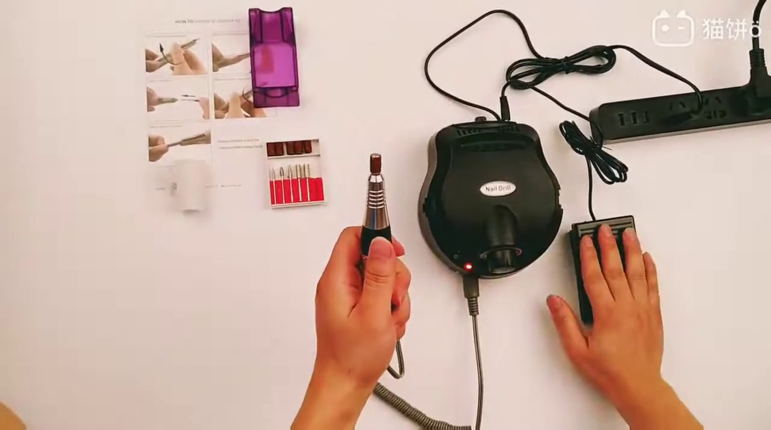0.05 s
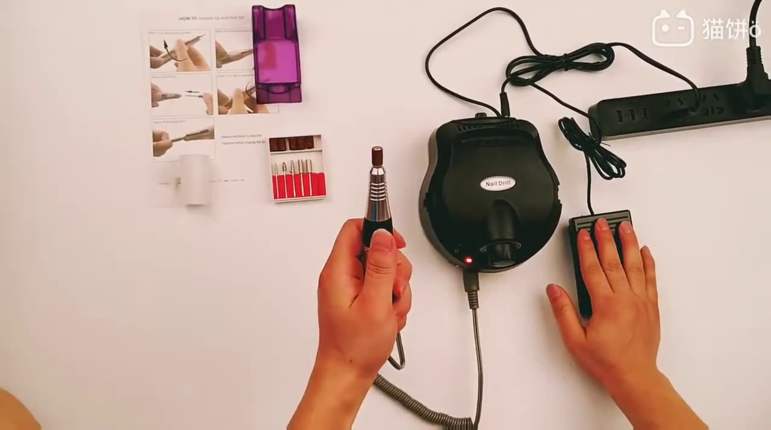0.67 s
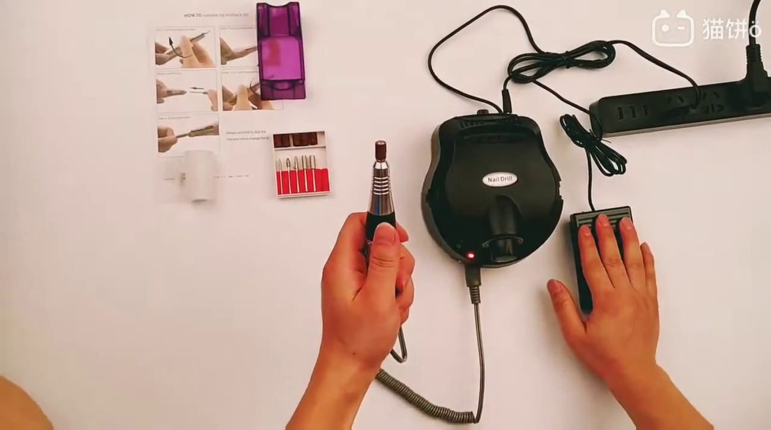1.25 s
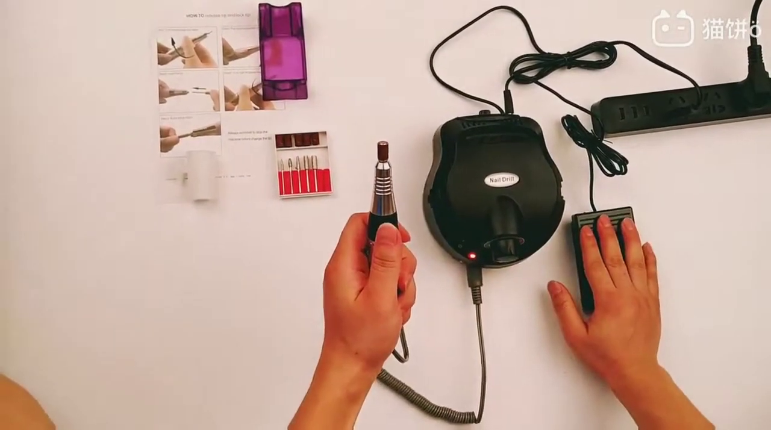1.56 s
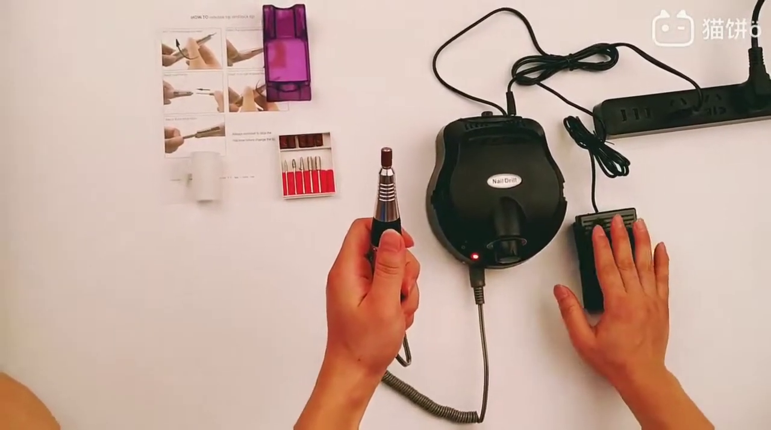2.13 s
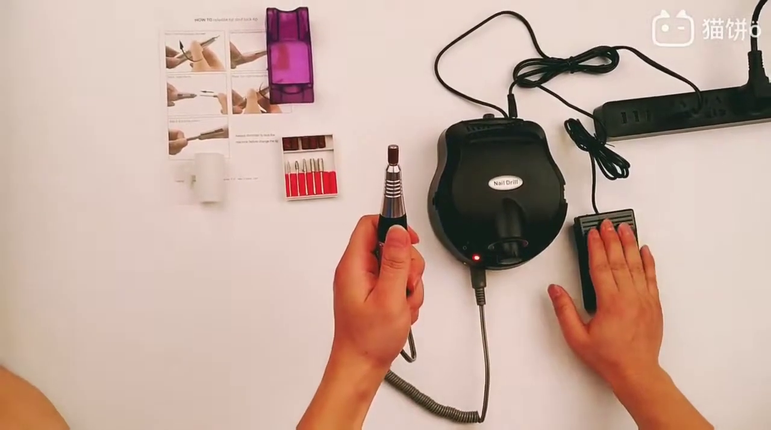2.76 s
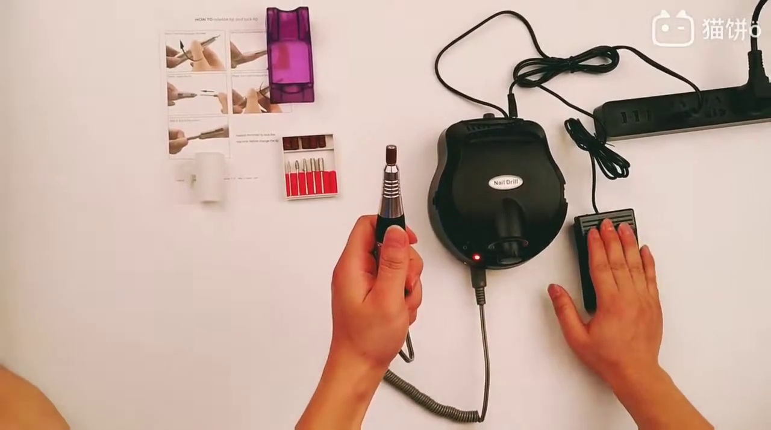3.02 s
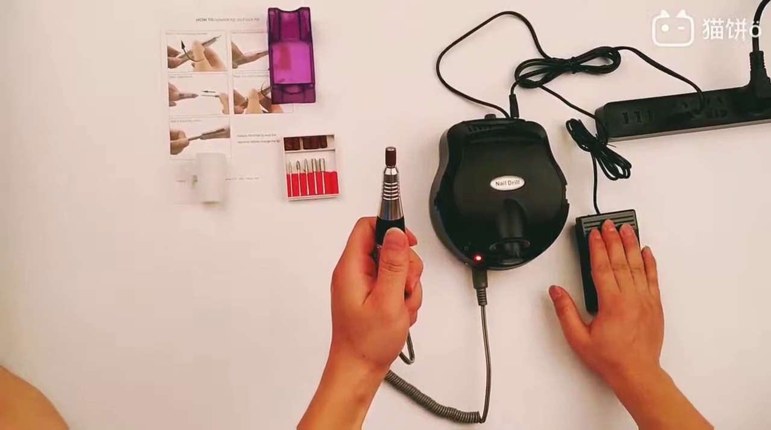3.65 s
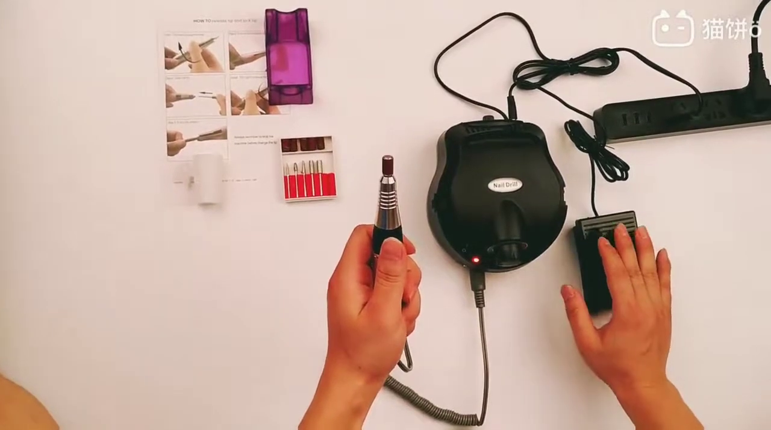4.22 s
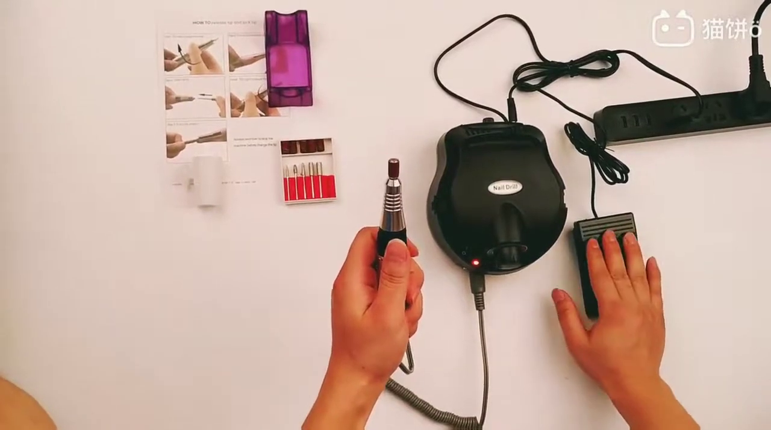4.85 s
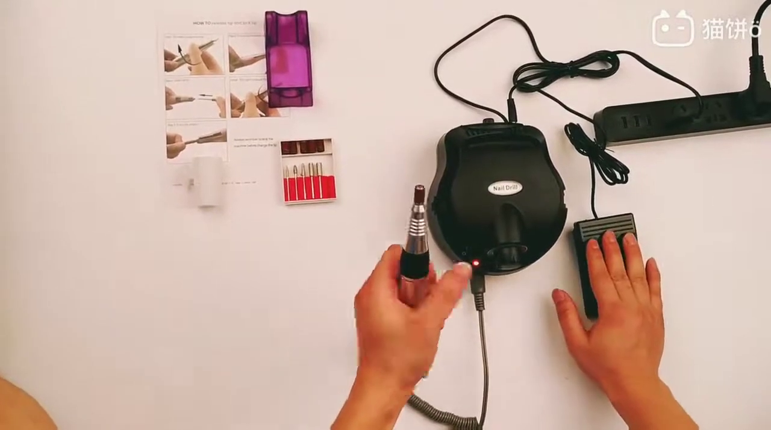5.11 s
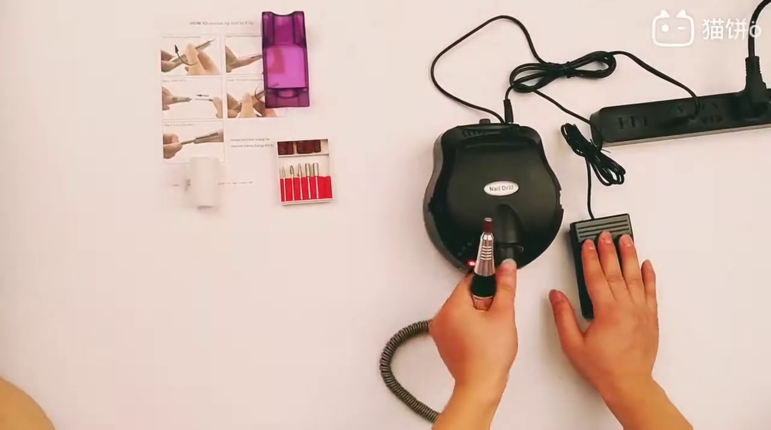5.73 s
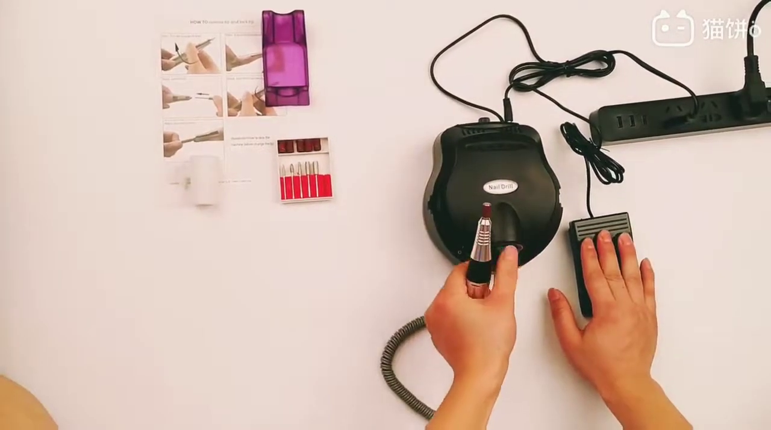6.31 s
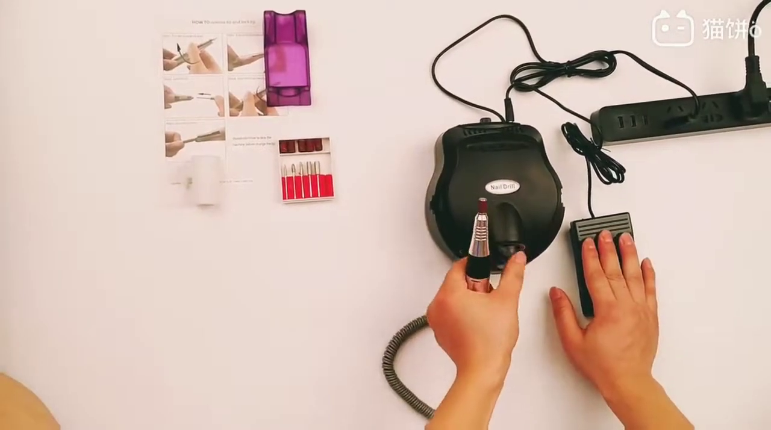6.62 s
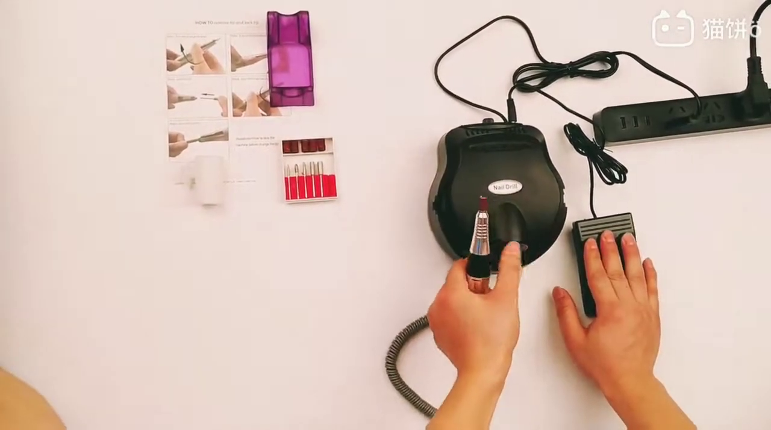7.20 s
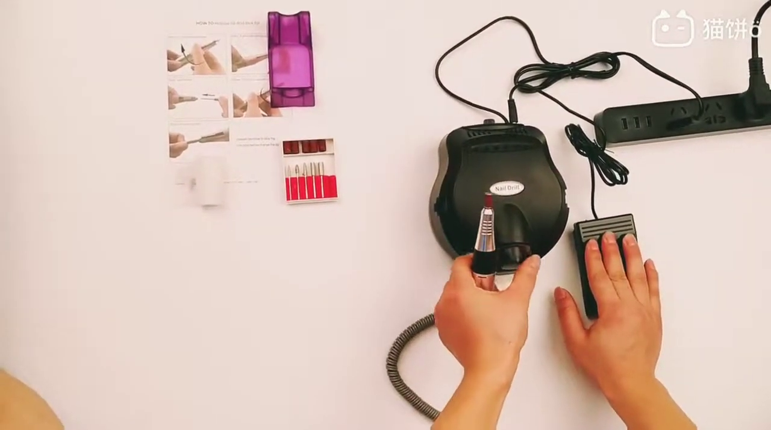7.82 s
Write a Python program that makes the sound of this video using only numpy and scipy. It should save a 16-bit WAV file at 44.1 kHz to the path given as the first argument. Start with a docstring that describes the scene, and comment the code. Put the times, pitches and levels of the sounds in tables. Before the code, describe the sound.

A plastic pedal switch clacks on a desk and a small electric nail drill spins up to a high, buzzing whine. The pedal snaps back and the motor coasts down. This happens twice. On a third press the drill keeps running, with a few soft handling knocks, then rises in pitch in three steps, turning raspier with a hum underneath. The sound is close, in a small quiet room.

```python
"""An electric nail drill runs free in one hand above a desk; the other hand works its pedal switch.
Twice the pedal clacks down, the motor whines up, the pedal springs back and the motor coasts to rest.
On the third run the handpiece is carried over to the control box, the speed knob is turned up in three
steps, and near top speed the rotor hums. Pedal blows ring the desk, plastic shell and switch;
the bearings rub and scrape with each turn and ring the handpiece."""
import sys
import numpy as np
from scipy import signal
from scipy.fft import rfft, irfft, next_fast_len
from scipy.io import wavfile
from scipy.ndimage import uniform_filter1d, map_coordinates

SR = 44100
rng = np.random.default_rng(int(sys.argv[2]) if len(sys.argv) > 2 else 0)


def generate_wav(sig):
    """Save sig (samples, or channels by samples) to the path in sys.argv[1] as 16-bit PCM at SR."""
    pcm = np.round(np.clip(np.atleast_2d(sig).T, -1, 1) * 32767).astype(np.int16)
    wavfile.write(sys.argv[1], SR, pcm)


N = 355446
TIME = np.arange(N) / SR
FFT_SIZE = next_fast_len(N, True)
FREQS = np.fft.rfftfreq(FFT_SIZE, 1 / SR)
LOW_HZ, TOP_HZ = 205, 264  # shaft speed settings

# handpiece pose: time_s, over_box (0 upright, 1 over the box), left_lead_ms, pan_db
POSE = [(4.9, 0.24, 0.762, 1), (5.3, 1, -0.12, 1.5), (5.6, 0.74, -0.072, -2), (6.3, 0.78, -0.063, -2),
        (6.6, 0.89, -0.055, 0.5), (7.5, 0.99, -0.0612, 0.5)]
# pedal down, motor starts: start_s, snap_db, thud_db, rebound_delay_s, rebound_db
PRESSES = [(0.1226, -28.5, -83, 0.034, -8), (2.352, -29, -63, .016, 4), (4.639, -25, -51, .009, -0.5)]
# pedal up, motor coasts: start_s, strength_db
RELEASES = [(1.507, 1), (3.6928, -1)]


def amp(db):
    """Decibels to gain."""
    return 10 ** (np.asarray(db) / 20)


def unit(x):
    """Scale to rms 1."""
    return x / np.sqrt(np.mean(abs(x) ** 2) + 1e-20)


def ramp(start_s, length_s):
    """Linear rise from 0 to 1."""
    return np.clip((TIME - start_s) / length_s, 0, 1)


def curves(rows):
    """Columns of a timed table at every sample."""
    time_s, *columns = np.transpose(rows)
    return [np.interp(TIME, time_s, column) for column in columns]


def at_hz(points, hz):
    """Interpolate a table over log frequency."""
    points_hz, values = np.transpose(points)
    return np.interp(np.log(hz + 1), np.log(points_hz + 1), values)


def filtered(x, gain):
    """Filter by a gain for each of FREQS."""
    return irfft(rfft(x, FFT_SIZE) * gain, FFT_SIZE)[..., :N]


def colour(x, spectrum):
    """Filter by rows of freq_hz, gain_db."""
    return filtered(x, amp(at_hz(spectrum, FREQS)))


def delayed(x, delay_ms):
    """Time-varying delay."""
    return map_coordinates(x, [(TIME - delay_ms / 1000) * SR], order=3, mode="nearest")


def add(mix, start_s, sound):
    """Mix in a stereo sound."""
    part = mix[:, round(start_s * SR):][:, :sound.shape[1]]
    part += sound[:, :part.shape[1]]


def pair(sides, alike):
    """Give two independent signals the correlation alike."""
    return np.array([sides[0], alike * sides[0] + np.sqrt(1 - alike ** 2) * sides[1]])


def stereo_noise(alike, size=N):
    """White noise, partly correlated left to right."""
    return pair(rng.standard_normal((2, size)), alike)


def wander(rate_hz):
    """Random waver around rate_hz, rms 1."""
    ratio = FREQS / rate_hz
    return unit(filtered(rng.standard_normal(N), ratio / (1 + ratio ** 3)))


def background(level_db=-76.5):
    """Faint steady room noise."""
    # noise spectrum: freq_hz, gain_db
    spectrum = [(15, -18), (25, 0), (86, -7), (1200, -19), (1600, -21), (1980, -25), (3080, -20),
                (3510, -16.5), (3900, -28.5), (6410, -21), (13000, -30.5)]
    return amp(level_db) * unit(colour(stereo_noise(alike=0.39), spectrum))


def room(x, alike=0.25, gap_s=.006, size=20000):
    """Small room: dense reflections, each band dying at its own rate."""
    # room decay: freq_hz, t60_s
    decay = [(100, 0.07), (250, 0.33), (1000, 0.26), (4000, 0.28), (13000, 0.16)]
    taps = stereo_noise(alike, size) * (np.arange(size) > gap_s * SR)
    hz, t, spectra = signal.stft(taps, SR, nperseg=256)
    tail = signal.istft(spectra * amp(-60 * t / at_hz(decay, hz)[:, None]), SR, nperseg=256)[1]
    return signal.oaconvolve(x, tail / np.linalg.norm(tail[0]), axes=1)[:, :N]


def desk_thud(band_hz=(165, 400), attack_s=0.0045, sway_hz=80, sway_db=-19, sway_s=0.02, size=8192):
    """A soft push rings the desk's low modes and sways its whole top."""
    # desk modes: freq_hz, width_hz, gain_db
    modes = [(170.3, 47, 0.5), (224, 50.4, 1.5), (288.6, 54, -4), (336, 85, -8.5)]
    t = np.arange(size) / SR
    ring = sum(amp(db) * np.exp(-np.pi * width_hz * t)
               * np.sin(2 * np.pi * hz * rng.uniform(0.9, 1.088) * t) for hz, width_hz, db in modes)
    bandpass = signal.butter(3, band_hz, "bandpass", fs=SR, output="sos")
    ring = signal.sosfilt(bandpass, ring * (1 - np.exp(-t / attack_s)))
    ring /= np.sqrt(np.mean(ring[:SR // 100] ** 2))
    sway = amp(sway_db) * np.exp(-t / sway_s) * np.sin(2 * np.pi * sway_hz * t)
    return np.array([ring + sway] * 2)


def strike(modes, chatter_s, alike, detune, attack_s=0.00037, size=8192):
    """A chattering contact rings slightly detuned modes; rms 1 over the first 10 ms."""
    t = np.arange(size) / SR
    force = stereo_noise(alike, size) * np.exp(-t / chatter_s) * (1 - np.exp(-t / attack_s))
    ring = sum(amp(db) * width_hz * np.exp(-np.pi * width_hz * t)
               * np.cos(2 * np.pi * hz * (1 + detune * rng.uniform(0.27, 1)) * t)
               for hz, width_hz, db in modes)
    sound = signal.fftconvolve(force, ring[None], axes=1)[:, :size]
    return sound / np.sqrt(np.mean(sound[:, :SR // 100] ** 2))


def blows(press_chatter_s=0.0079, shell_offset_db=-10.5):
    """Knocks, presses and releases as start_s, (thud_db, shell_db, snap_db), chatter_s, switch modes."""
    # modes of the switch in its case: freq_hz, width_hz, closing_db, opening_db
    switch_modes = [(2380, 260, -14, 1), (3020, 300, -3, 0), (4060, 250, 4, 4), (4420, 400, -9, 0),
                    (5060, 240, 5, -11), (5950, 340, 2, -14), (6880, 400, 0, -4), (7900, 420, 0, 1),
                    (8500, 500, -4, 0), (9250, 450, -8, 0), (9950, 450, -1, -4), (11000, 500, -5, 2),
                    (12100, 450, -7, -18), (6500, 6000, -16, -21)]
    # fingers on pedal and box: start_s, thud_db, shell_db, snap_db, chatter_s
    knocks = [(.025, -48, -49.5, -71, 0.029), (0.101, -77, -52, -45, 0.012),
              (2.202, -41.5, -65.5, -71.5, 0.072), (2.312, -44, -43, -68, 0.0043),
              (2.329, -60, -48.5, -67, 0.026), (4.442, -82.5, -86, -77, 0.013),
              (4.487, -89, -88, -82.5, 0.0052), (4.543, -40, -67, -70, 0.052),
              (4.615, -42, -39.5, -61, 0.0083), (5.262, -52, -59.5, -78, 0.016),
              (5.283, -48, -62, -71, 0.032), (5.859, -66, -70, -63, 0.032)]
    # offsets that dull a rebound: thud_db, shell_db, snap_db
    dulling_db = (6, -3.5, -16.5)
    # switch opens, lid hits its stop, bounces, settles: delay_s, thud_db, shell_db, snap_db, chatter_s
    spring_back = [(0, -56, -38.5, -25, 0.0059), (.0095, -43, -29.5, -30, 0.014),
                   (.022, -52.5, -38.5, -37, .007), (.047, -43, -56, -68.5, .01)]
    closing = [(hz, width_hz, db) for hz, width_hz, db, _ in switch_modes]
    opening = [(hz, width_hz, db) for hz, width_hz, _, db in switch_modes]
    for start_s, *levels_db, chatter_s in knocks:
        yield start_s, levels_db, chatter_s, closing
    for start_s, snap_db, thud_db, rebound_s, rebound_db in PRESSES:
        levels_db = np.array([thud_db, snap_db + shell_offset_db, snap_db])
        yield start_s, levels_db, press_chatter_s, closing
        yield start_s + rebound_s, levels_db + dulling_db + rebound_db, press_chatter_s / 2, closing
    for start_s, strength_db in RELEASES:
        for delay_s, *levels_db, chatter_s in spring_back:
            yield start_s + delay_s, np.array(levels_db) + strength_db, chatter_s, opening


def pedal(shell_band_hz=(200, 1680)):
    """Each blow thuds through the desk, rattles the plastic shell and rings the switch."""
    # shell modes: freq_hz, width_hz, gain_db
    shell_modes = [(493, 230, -13), (865, 39, 1), (1023, 110, 9), (1280, 73, -4.5), (1563, 180, -1)]
    thud, shell, snap = np.zeros((3, 2, N))
    for start_s, (thud_db, shell_db, snap_db), chatter_s, switch_modes in blows():
        add(thud, start_s, amp(thud_db) * desk_thud())
        add(shell, start_s, amp(shell_db) * strike(shell_modes, chatter_s, alike=0.48, detune=0.0067))
        add(snap, start_s, amp(snap_db) * strike(switch_modes, chatter_s, alike=0.11, detune=0.0063))
    plastic_damping = signal.butter(4, shell_band_hz, "bandpass", fs=SR, output="sos")
    shell = signal.sosfilt(plastic_damping, shell)
    reflections = amp(-3) * room(thud, alike=0.93) + amp(-9) * room(shell) + amp(-10) * room(snap)
    return thud + shell + snap + reflections


def shaft(lag_s=.048, coast_s=.69, flutter=.0014, flutter_hz=22):
    """Speed and angle: the rotor lags pedal and knob; once released, friction brakes it evenly."""
    # powered speed without the knob steps: time_s, speed_hz
    cruise = [(.42, 198.8), (.62, 201.3), (.78, 201.4), (1.0, 204.4), (1.25, 205.45), (1.5, 205.2),
              (2.6, 203.4), (3.0, 205.9), (3.28, 204.6), (3.55, 204.4), (3.69, 203.5), (4.9, 204.2),
              (5.22, 204.75), (5.42, 206.0), (5.64, 206.1), (6.1, 207.15), (6.38, 206.15)]
    # knob turns: start_s, length_s, step_hz
    knob_steps = [(6.42, .14, 24.4), (6.87, .1, 8.8), (7.305, .1, 24.7)]
    pole = np.exp(-1 / (lag_s * SR))
    knob_hz = sum(step_hz * ramp(start_s, length_s) for start_s, length_s, step_hz in knob_steps)
    knob_hz = signal.lfilter([1 - pole], [1, -pole], knob_hz)
    stops_s = [start_s for start_s, _ in RELEASES] + [np.inf]
    running = sum((1 - np.exp(-np.maximum(TIME - on_s, 0) / lag_s)) * (1 - ramp(off_s, coast_s))
                  for (on_s, *_), off_s in zip(PRESSES, stops_s))
    speed_hz = running * (curves(cruise)[0] + knob_hz) * (1 + flutter * wander(flutter_hz))
    return speed_hz, np.cumsum(speed_hz) / SR


def partials(speed_hz, turns, range_hz=6.7, pan_db=-2, waver_db=2, waver_hz=10):
    """A few shaft orders stand out of the whirr near the low setting."""
    # tones: shaft_order, level_db
    orders = [(7, -70), (9, -69), (10, -68), (21, -66), (24, -70)]
    near_low = np.exp(-((speed_hz - LOW_HZ) / range_hz) ** 2)
    lean_db = np.array([[pan_db], [-pan_db]]) / 2
    tones = sum(amp(db + waver_db * wander(waver_hz) + lean_db)
                * np.sin(2 * np.pi * (round(order) * turns + rng.random((2, 1)))) for order, db in orders)
    return np.sqrt(2) * near_low * tones


def rotor_hum(turns, start_s=7.39, attack_s=0.1, release_s=0.041, waver_db=3, waver_hz=11):
    """Orders of the unbalanced rotor, each wavering by itself; timed to the last knob step."""
    # hum tones: shaft_order, level_db, right_phase_rad, end_s
    orders = [(1, -56.5, 0.5, 8.0), (3, -60.5, 0.5, 8.1), (8, -61, 1.5, 9.9), (11, -59, -2, 8.1),
              (14, -60.5, -1.5, 8.1), (18, -67, 2.5, 8.1)]
    out = np.zeros((2, N))
    for order, db, phase_rad, end_s in orders:
        gate = ramp(start_s, attack_s) * (1 - ramp(end_s - release_s, release_s))
        tone = np.sin(2 * np.pi * round(order) * turns + np.array([[0], [phase_rad]]))
        out += gate * amp(db + waver_db * wander(waver_hz)) * tone
    return np.sqrt(2) * out


def grinding(speed_hz, turns, throb=0.41, rattle_db=2, rattle_hz=45):
    """A bearing scrapes unevenly, hardest once a turn, ringing a low growl and a high rasp."""
    # bearing resonances: freq_hz, width_hz, gain_db
    growl_modes = [(1040, 360, -6), (1673, 550, -2.5), (2280, 460, -3.5)]
    rasp_modes = [(5596, 230, -0.5), (6170, 1500, -9.5)]
    # scrape strength: time_s, growl_db, rasp_db
    levels = [(.25, -75, -62), (.6, -62.5, -58.5), (0.998, -68, -75.5), (4.9, -69, -74), (5.25, -61, -61),
              (5.6, -65, -63), (6.3, -66, -64.5), (6.6, -65, -66), (7.25, -61.5, -58.5), (7.45, -56, -57),
              (7.7, -59.5, -60.5), (7.98, -62, -71), (8.03, -50.5, -54.5)]
    pressure = np.exp(throb * np.cos(2 * np.pi * turns))
    scrape = stereo_noise(alike=.3) * pressure * amp(rattle_db * wander(rattle_hz))
    out = np.zeros((2, N))
    for modes, level_db in zip((growl_modes, rasp_modes), curves(levels)):
        response = sum(amp(db) / (1 + (2 * (FREQS - hz) / width_hz) ** 2) ** 2
                       for hz, width_hz, db in modes)
        out += unit(filtered(scrape, response)) * amp(level_db)
    return out * np.minimum(speed_hz / LOW_HZ, 1) ** 3


def order_drift(memory_turns, alike, orders=84, turn_count=1800):
    """Complex amplitude of each shaft order, drifting turn by turn."""
    shape = (2, turn_count, orders)
    fresh = rng.standard_normal(shape) + 1j * rng.standard_normal(shape)
    pole = np.exp(-1 / memory_turns)
    return unit(pair(signal.lfilter([1], [1, -2 * pole, pole ** 2], fresh, axis=1), alike))


def raceway(turns, load=0.3, steps_per_turn=1024):
    """The bearing rolls over nearly the same roughness each turn, pressing hardest on one side."""
    steady = order_drift(memory_turns=20., alike=.6)
    steady = unit(steady / abs(steady) ** 0.87)  # orders of nearly even strength
    restless = order_drift(memory_turns=2.1, alike=.3)
    pressure = np.exp(load * np.cos(2 * np.pi * np.arange(steps_per_turn) / steps_per_turn))
    track = (irfft(steady + 1.4 * restless, steps_per_turn) * pressure).reshape(2, -1)
    position = turns * steps_per_turn
    return unit(np.array([np.interp(position, np.arange(len(side)), side) for side in track]))


def rubbing(speed_hz, turns, slow_hz=196, slip_gain=2.6, slip_hz_per_s=1800,
            throb=0.11, rattle_db=1.1, rattle_hz=40):
    """Bearing buzz; a throbbing hiss takes over when the shaft runs slow or speeds up. Both rattle."""
    # spectra of the repeating buzz, the running hiss and the slipping hiss: freq_hz, gain_db
    buzz_spectrum = [(100, -18), (800, -11), (1200, -4), (1700, -2), (2500, 0), (13000, 0)]
    hiss_spectrum = [(100, -4), (900, -5), (1400, -10), (2000, -20), (3000, -34), (4700, -34), (6200, -24),
                     (7700, -28), (9000, -28), (13000, -25)]
    slip_spectrum = [(100, -4.5), (900, -6), (1700, -2), (3000, 1.5), (4300, 1.5), (13000, 8)]
    urged = np.diff(uniform_filter1d(speed_hz, size=4000), prepend=0) * SR / slip_hz_per_s
    slow = np.clip(2 * (1 - speed_hz / slow_hz), 0, 1) ** .5
    loose = np.clip(np.maximum(slow, urged), 0, 1)
    noise = stereo_noise(alike=0.5) * np.exp(throb * np.cos(2 * np.pi * turns))
    driven = colour(raceway(turns), buzz_spectrum) + colour(noise, hiss_spectrum)
    slipping = slip_gain * colour(noise, slip_spectrum)
    return ((1 - loose) * driven + loose * slipping) * amp(rattle_db * wander(rattle_hz))


def desk_echo(x, echo_db=-10, delay_ms=1.5, sway_ms=.035, sway_hz=.9):
    """The desk reflects the sound; hand sway slides the notches across the shaft orders."""
    return np.array([side + amp(echo_db) * delayed(side, delay_ms + sway_ms * wander(sway_hz))
                     for side in x])


def body(rub, state, top_pan_share=0.16):
    """Handpiece resonances, blended by state: 0 upright, 1 over the box, 2 there at top speed."""
    # resonances: freq_hz, width_hz, upright_db, box_db, top_speed_db, pan_db
    modes = [(496, 2600, -13, -17, -11, -1), (1740, 644, -16.5, -23.5, -11.5, -5.5),
             (3230, 2300, -23, -15.5, -10, -2.5), (4287, 1100, -12, -14.5, -7.5, 2),
             (5050, 310, -9.5, -14, -12.5, -4.5), (5700, 650, -12, -18.5, -10.5, -1.5),
             (6850, 1800, -18, -14, -5.5, -2.5), (7820, 600, -9, -13, -5.5, 5),
             (8320, 710, -5, -12, -2.5, 0.5), (9430, 790, -7.5, -7.5, 2.5, -4),
             (9860, 690, -16.5, -8, -11, -9), (10960, 870, -16.5, -15.5, -5, -5),
             (12300, 750, -15, -17.5, -7, -3)]
    hz, width_hz, *levels_db, pan_db = np.transpose(modes)
    bumps = np.exp2(-np.minimum((2 * (FREQS - hz[:, None]) / width_hz[:, None]) ** 2, 20))
    lean_db = np.array([pan_db, -pan_db]) / 2
    out = np.zeros((2, N))
    for k, (db, pan_share) in enumerate(zip(levels_db, (1, 1, top_pan_share))):
        response = np.sqrt(amp(db + pan_share * lean_db) ** 2 @ bumps)
        out += np.clip(1 - abs(state - k), 0, 1) * filtered(rub, response)
    return out


def whistle(speed_hz, turns, orders=range(35, 49), waver_db=1.6, waver_hz=9):
    """A shaft order sings as it crosses a sharp resonance, louder at higher speed."""
    # resonance upright, then over the box: freq_hz, width_hz, gain_db, speed_power, left_lead_ms, pan_db
    resonances = [(9370, 320, -10.5, 12, 0.019, -8.5), (9610, 270, -10.5, 4, -0.044, -1)]
    over_box = curves(POSE)[0]
    out = np.zeros((2, N))
    for share, (hz, width_hz, db, power, lead_ms, pan_db) in zip((1 - over_box, over_box), resonances):
        tone = sum(np.exp(2j * np.pi * (k * turns + rng.random()))
                   / (1 + 2j * (k * speed_hz - hz) / width_hz) for k in orders)
        tone *= share * (speed_hz / LOW_HZ) ** power * amp(db + waver_db * wander(waver_hz))
        right_lag = np.exp(-2j * np.pi * hz * lead_ms / 1000)
        out += np.sqrt(2) * np.real([tone, tone * right_lag]) * amp([[pan_db / 2], [-pan_db / 2]])
    return out


def handpiece(speed_hz, turns, room_db=-12, flicker_db=0.98, flicker_hz=6.7):
    """Rubbing rings the handpiece; each band is levelled, then grows and fades with shaft speed."""
    # drone, whirr, whine, whistle, fizz: upright_db, box_db, speed_power, fade_speed_hz, pan_share
    bands = [(-54, -62, 2.65, 216, 0.3), (-49.5, -50.5, 0.76, 200, 0.22), (-47.5, -47.5, 0.34, 167, 0.78),
             (-45, -46.5, 3, 149, 2.2), (-51.5, -48, 0.1, 163, 0.87)]
    edges_hz = [0, 2450, 7000, 8900, 10200, SR / 2]
    # band swells: time_s, gain_db
    whirr_swell = [(.8, -3), (.95, 1), (1.1, -1.5), (1.45, 0), (1.7, 2), (2.5, 3.5), (2.75, -0.5),
                   (3.05, -1.5), (4.0, 3.5), (5.0, 0), (5.25, 5), (5.6, 0.5), (6.38, -2), (6.52, 4.5),
                   (6.85, -2), (7.0, 1.5), (7.45, 3), (7.8, 1)]
    whine_swell = [(.2, 0.5), (.45, 1), (.65, -2), (.85, -1.5), (.95, 1.5), (1.3, 0.5), (1.7, 2), (2.5, 2),
                   (2.85, -1), (3.6, -1), (4.75, 3.5), (5.15, -3.5), (5.6, -1), (6.3, -3.5), (6.52, 0.5),
                   (7.2, -1.5), (7.45, -1.5), (7.7, -2.5), (8.0, 0)]
    whistle_swell = [(.3, -0.5), (.5, 3.5), (.7, 0), (1.45, -0.5), (2.5, 1), (2.85, -2.5), (3.5, -.5),
                     (5.051, 0), (5.55, 3.5), (6.1, -3), (6.35, 1.5), (6.55, -0.5), (7.05, 2), (7.29, 2.5),
                     (7.41, 2), (7.55, 3), (7.97, 0), (8.04, 4.5)]
    whirr_db, whine_db, whistle_db = (curves(r)[0] for r in (whirr_swell, whine_swell, whistle_swell))
    swells_db = (whirr_db / 2, whirr_db, whine_db, whistle_db, (whirr_db + whine_db) / 2)
    over_box, lead_ms, pan_db = curves(POSE)
    lean_db = np.array([pan_db, -pan_db]) / 2
    rub = rubbing(speed_hz, turns)
    rub[1] = delayed(rub[1], lead_ms)
    rub = desk_echo(rub)
    rub += amp(room_db) * room(rub)
    turned_up = np.clip((speed_hz - LOW_HZ) / (TOP_HZ - LOW_HZ), 0, 1) ** 3
    voice = unit(body(rub, over_box * (1 + turned_up))) + whistle(speed_hz, turns)
    out = np.zeros((2, N))
    for low_hz, high_hz, swell_db, row in zip(edges_hz, edges_hz[1:], swells_db, bands):
        upright_db, box_db, power, fade_hz, pan_share = row
        band = filtered(voice, (FREQS >= low_hz) & (FREQS < high_hz))
        band /= np.sqrt(uniform_filter1d((band ** 2).mean(0), size=4000) + 1e-12)
        growth = np.maximum(speed_hz / LOW_HZ, 1) ** power
        fade = speed_hz ** 2 / (speed_hz ** 2 + fade_hz ** 2)
        pose_db = upright_db + (box_db - upright_db) * over_box
        level_db = pose_db + swell_db + flicker_db * wander(flicker_hz)
        out += band * growth * fade * amp(level_db + pan_share * lean_db)
    return out


def scene():
    """Drill, pedal and room noise."""
    speed_hz, turns = shaft()
    drill = handpiece(speed_hz, turns) + partials(speed_hz, turns) + grinding(speed_hz, turns)
    return drill + rotor_hum(turns) + pedal() + background()


def record(dry, cutoff_hz=13020):
    """The recorder's band limit."""
    lowpass = signal.firwin(511, cutoff_hz, window=("kaiser", 9), fs=SR)
    return signal.oaconvolve(dry, lowpass[None], "same")


dry = scene()
out = record(dry)
generate_wav(out)
```